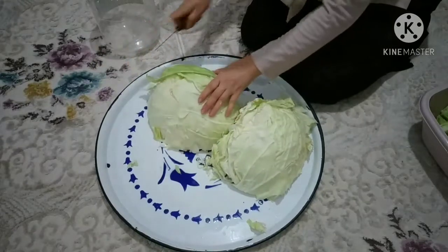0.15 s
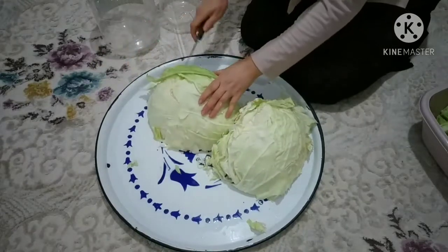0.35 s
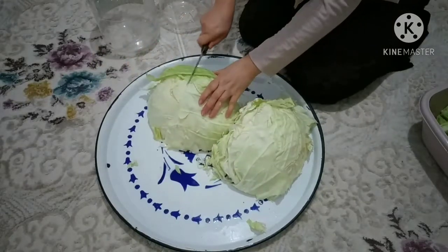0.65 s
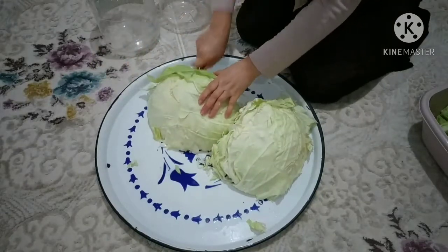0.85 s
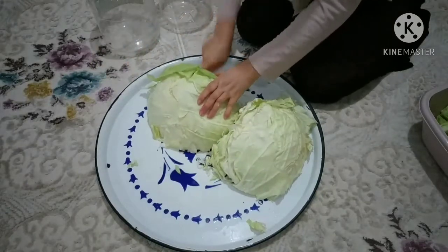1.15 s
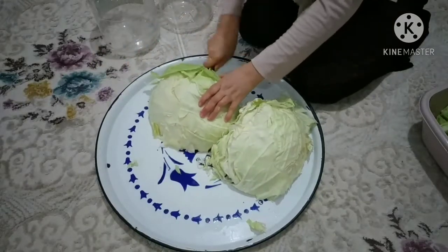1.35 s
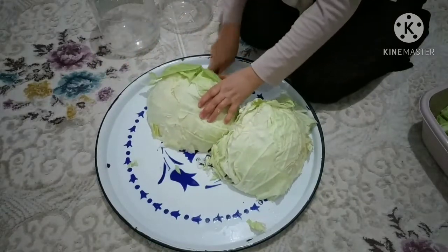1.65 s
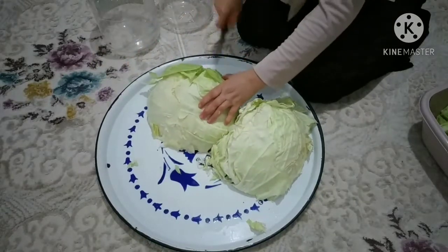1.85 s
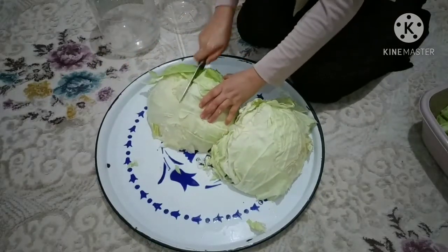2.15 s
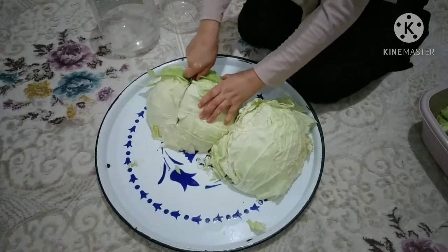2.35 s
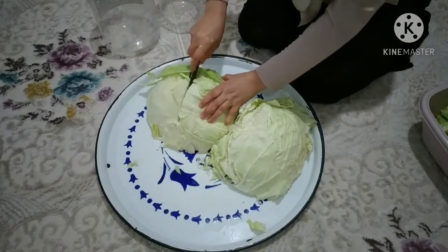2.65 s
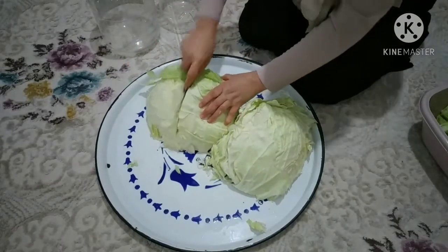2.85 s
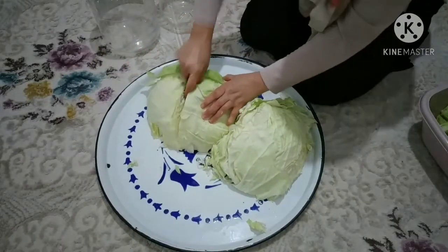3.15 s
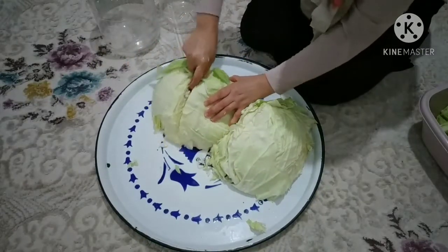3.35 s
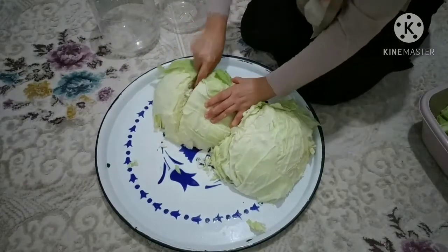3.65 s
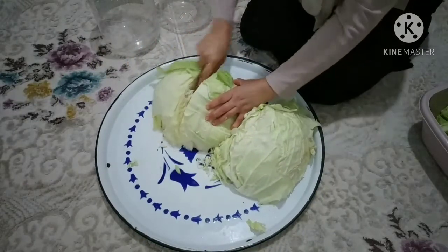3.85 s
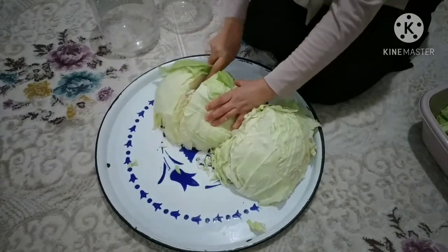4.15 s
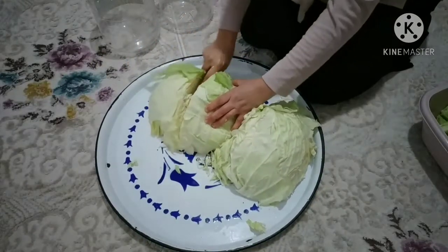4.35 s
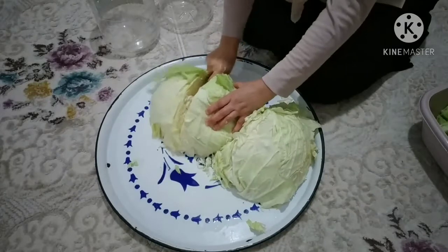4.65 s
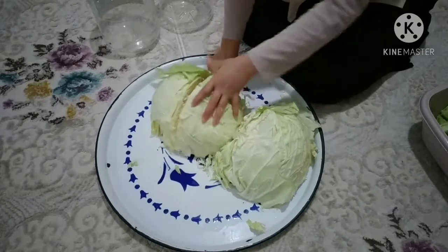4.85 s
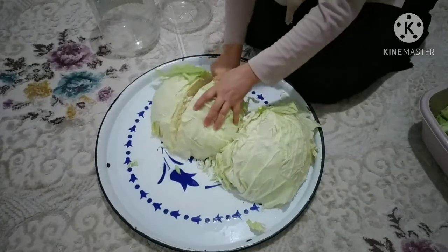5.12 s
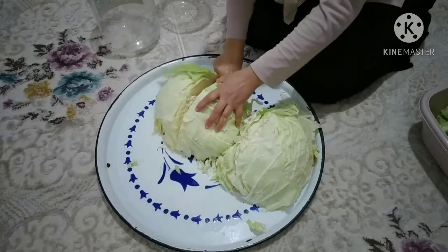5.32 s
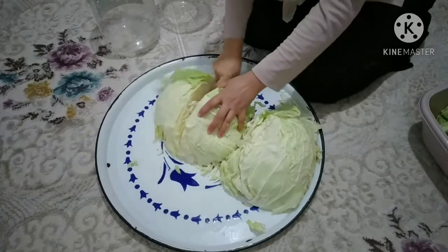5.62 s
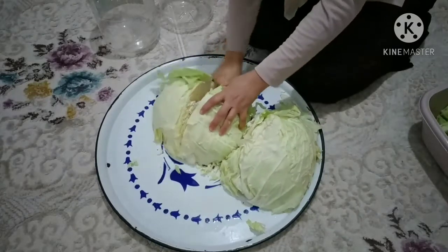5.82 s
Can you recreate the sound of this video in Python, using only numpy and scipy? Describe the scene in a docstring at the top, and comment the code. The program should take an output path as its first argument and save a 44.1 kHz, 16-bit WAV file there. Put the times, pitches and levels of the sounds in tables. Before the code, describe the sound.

A knife saws through a crisp raw cabbage in crunching strokes, with one loud metallic knock on an enamel tray in a quiet room.

```python
"""Crisp crunching strokes: a kitchen knife saws through a raw cabbage on an enamelled tray, on carpet, in a small room.
After a hand on the leaves, strokes and scuffs speed up, bite and stop; random fractures shake, crunch and spray.
Ringing modes make the snapping ribs, thuds of the head, dull taps and the tray that the blade knocks and drags over.
Once the blade squeaks, as a wavering harmonic tone; the knock overloads the microphone, whose output swings slowly.
Dull air noise and a faint hum of sines lie below."""
import sys
import numpy as np
from scipy import signal
from scipy.fft import rfft, irfft
from scipy.io import wavfile
from scipy.ndimage import uniform_filter1d

SR = 44100
rng = np.random.default_rng(int(sys.argv[2]) if len(sys.argv) > 2 else 0)


def file_out(sig):
    """Save sig as 16-bit WAV at sys.argv[1]."""
    # one column per channel
    cols = np.atleast_2d(sig).T
    # limit, then scale
    lim = np.clip(cols, -1, 1)
    pcm = np.round(lim * 32767).astype(np.int16)
    wavfile.write(sys.argv[1], SR, pcm)


N = 263718
TIME = np.arange(N) / SR


def from_db(db):
    """Decibels to amplitude gain."""
    return 10 ** (np.asarray(db) / 20)


def rms_one(x):
    """Scale to unit power."""
    return x / np.sqrt(np.mean(x ** 2) + 1e-20)


def in_time(rows):
    """Each column of a time curve, interpolated at every sample."""
    time_s, *columns = np.transpose(rows)
    return [np.interp(TIME, time_s, column) for column in columns]


def drift(knots_per_s):
    """Random values at regular knots, joined by straight lines, rms 1."""
    knots = rng.standard_normal(4096)
    return rms_one(np.interp(TIME * knots_per_s, np.arange(len(knots)), knots))


def convolve(x, response):
    """Pass one or two channels through a response."""
    full = signal.fftconvolve(np.atleast_2d(x), np.atleast_2d(response), axes=-1)
    return full[:, :N]


def colour(x, spectrum, size=8192):
    """Causal minimum-phase filter with the given spectrum, via the folded cepstrum."""
    hz, db = np.transpose(spectrum)
    grid_hz = np.maximum(np.arange(size // 2 + 1) * SR / size, 1)
    gain = from_db(np.interp(np.log(grid_hz), np.log(hz), db))
    cepstrum = irfft(np.log(gain))
    cepstrum[1:size // 2] *= 2
    cepstrum[size // 2 + 1:] = 0
    return convolve(x, irfft(np.exp(rfft(cepstrum))))[0]


def ring(clicks, hz, t60_s):
    """Two-pole resonator: a unit click starts a decaying sine of height 1."""
    radius = from_db(-60 / (t60_s * SR))
    angle = 2 * np.pi * hz / SR
    poles = [1, -2 * radius * np.cos(angle), radius * radius]
    return signal.lfilter([0, np.sin(angle)], poles, clicks + 1e-18)


def clicks_of(events, extra_db=0):
    """One click per row (time [s], level [dB])."""
    time_s, db = np.transpose(events)
    clicks = np.zeros(N)
    clicks[(time_s * SR).astype(int)] = from_db(db + extra_db)
    return clicks


def strike(events, modes, vary_db):
    """Every blow excites each mode with a random strength of its own."""
    chance_db = vary_db * rng.standard_normal((len(events), len(modes)))
    return sum(ring(clicks_of(events, db + chance_db[:, k]), hz, t60_s)
               for k, (hz, db, t60_s) in enumerate(modes))


def fractures(per_s, spread_db, clump_db, spectrum):
    """Cells burst at random, mostly small, in clumps as leaves give way; short-term power is levelled."""
    sizes = from_db(spread_db * np.minimum(rng.exponential(1, N), 4)) * rng.choice([-1, 1], N)
    bursts = sizes * (rng.random(N) < per_s / SR) * from_db(clump_db * drift(170))
    sound = colour(bursts, spectrum)
    power = np.abs(uniform_filter1d(sound ** 2, size=3000))
    return sound / np.sqrt(power + 1e-12)


def two_ports(size, apart_hz):
    """Diffuse noise at two close ports: alike in the bass, increasingly unlike in the treble."""
    mid, side = rng.standard_normal((2, size))
    side = signal.sosfilt(signal.butter(1, apart_hz, "high", fs=SR, output="sos"), side)
    return mid + side * np.array([[1], [-1]])


def room(x, wet_db, t60_s, early_db, early_t60_s=0.04, delay_samples=4):
    """Direct sound, quick reflections from the tray and the room's tail, scaled to keep mean power."""
    t = TIME[:SR // 3]
    early = two_ports(len(t), 800) * from_db(-60 * t / early_t60_s) * (t > .0004)
    # long waves bend round the tray
    early = signal.sosfilt(signal.butter(2, 550, "high", fs=SR, output="sos"), early)
    late = two_ports(len(t), 500) * from_db(-60 * t / t60_s) * (t > .005)
    response = (from_db(early_db) * rms_one(early) + from_db(wet_db) * rms_one(late)) / np.sqrt(len(t))
    response[0, delay_samples] += 1  # off axis: left hears the direct sound later
    response[1, 0] += 1
    return convolve(x, response / np.sqrt(1 + from_db(early_db) ** 2 + from_db(wet_db) ** 2))


def speed(start_s, length_s, up_s, down_s):
    """Speed of one movement, 0-1: linear rise, hold, linear fall."""
    rise = (TIME - start_s) / up_s
    fall = (start_s + length_s - TIME) / down_s
    return np.clip(np.minimum(rise, fall), 0, 1)


# strokes of the blade and short scuffs, the first by a hand on the leaves: (start [s], length [s],
# relative sliding level [dB], extra force of the bite [dB], crispness [dB], shaking of the head [dB])
STROKES = [(0.064, 0.13, -53, -9, 8, -12), (0.663, 0.13, -48, -16, 7.5, 16.5),
           (0.724, 0.34, -45, 12, 1.5, 0), (1.055, 0.34, -48, 14.5, 1.5, -0.5),
           (1.384, 0.2, -35.5, 2.5, 1, -1), (1.597, 0.29, -47.5, 1.5, 9.5, -4),
           (2.083, 0.36, -54, -6.5, 4, 0.5), (2.186, 0.31, -48, 8.5, 4.5, 1.5),
           (2.397, 0.22, -46, -2.5, -3.5, 3.5), (2.588, 0.13, -48.5, -4, -1.5, 1.5),
           (2.759, 0.36, -44, 7, 1, -3), (3.045, 0.38, -47.5, 10, 0, 0), (3.362, 0.17, -39, 1.5, 0, 2.5),
           (3.488, 0.18, -47.5, 5, -1, 3), (3.606, 0.38, -42.5, 6, -1, -1.5),
           (3.877, 0.26, -45.5, 4.5, -0.5, -3.5), (4.059, 0.19, -41, 2, -2.5, -4.5),
           (4.176, 0.26, -44, 2.5, -4, -3), (4.335, 0.25, -47.5, 5, -12.5, -2.5),
           (4.466, 0.28, -46, 5, -0.5, 0), (4.687, 0.27, -41, -2.5, -1, -2),
           (4.892, 0.21, -38.5, -10.5, -2.5, -13), (5.045, 0.24, -47, 4, -1.5, 3.5),
           (5.236, 0.14, -43.5, 3, -2.5, 0), (5.354, 0.35, -45.5, 6.5, -3.5, 0.5),
           (5.722, 0.21, -39.5, -7.5, -7, 3.5)]
# spectra of head, leaves and bursting cells: (frequency [Hz], relative level [dB])
SHAKE_SPECTRUM = [(60, -33), (130, -10.5), (175, -13.5), (215, -1), (300, 1.5), (380, -2.5), (460, -9.5),
                  (600, -16), (1000, -56)]
CRUNCH_SPECTRUM = [(200, -12.5), (450, 2), (650, -5), (880, 3), (1150, -2.5), (1500, -1), (2000, -4),
                   (2500, -9.5), (3000, -22), (3600, -36.5), (6000, -59)]
SPRAY_SPECTRUM = [(1500, -27), (2800, 7.5), (3400, 4), (4300, 4), (6000, 1.5), (7500, 2), (8800, -6.5),
                  (11000, -9), (13000, -20.5), (15500, -33)]
# how each layer follows a stroke: (relative level [dB], share of full speed at which it sets in [0-1],
# exponent of speed [-], exponent of force [-])
SHAKE_LAW = (-1, 0.34, 0.7, 1.23)
CRUNCH_LAW = (1.1, .05, 0.88, 1.32)
SPRAY_LAW = (-12.5, 0.3249, 1.52, 1.02)


def cutting(flaps_db=-8.5):
    """Fractures shake the head, crunch in the leaves and spray fine ticks that are nearly dry."""
    *_, crispness_db, shaking_db = np.transpose(STROKES)
    shaking = np.sqrt(settling(stroke_power(SHAKE_LAW, shaking_db), creak_db=-12))
    tearing = np.sqrt(settling(stroke_power(CRUNCH_LAW, np.zeros(len(STROKES))), creak_db=-12.5))
    bursting = np.sqrt(settling(stroke_power(SPRAY_LAW, crispness_db), creak_db=-18.5))
    shake = shaking * fractures(per_s=600, spread_db=2.5, clump_db=0.5, spectrum=SHAKE_SPECTRUM)
    crunch = tearing * fractures(per_s=1200, spread_db=2.5, clump_db=1.0, spectrum=CRUNCH_SPECTRUM)
    flap_tone = colour(fibres(), [(300, -8), (600, 4), (2400, 0.0), (3500, -28)])
    flaps = tearing * from_db(flaps_db) * flap_tone
    spray = bursting * fractures(per_s=12000, spread_db=4.0, clump_db=1.5, spectrum=SPRAY_SPECTRUM)
    head = room(shake + thuds(), wet_db=-9.5, t60_s=.25, early_db=-11.5)
    leaves = along_the_blade(crunch + flaps + ribs(), wet_db=-2.5, t60_s=0.2, early_db=1, early_t60_s=0.016)
    ticks = along_the_blade(spray, wet_db=-16, t60_s=.05, early_db=-2.5, early_t60_s=0.081)
    return head + leaves + ticks


SPEED_UP_S, SLOW_DOWN_S = 0.088, 0.089
BITE_AT_S, BITE_BUILD_S, BITE_EASE_S = .126, .046, .064  # peak after stroke start; Gaussian widths


def stroke_power(law, trims_db):
    """Power of all strokes and scuffs in one layer: grows with speed and with the force of the bite."""
    layer_db, least_speed, speed_power, force_power = law
    power = np.zeros(N)
    for (start_s, length_s, slide_db, bite_db, _, _), trim_db in zip(STROKES, trims_db):
        stroke_speed = speed(start_s, length_s, SPEED_UP_S, SLOW_DOWN_S)
        pace = (stroke_speed - least_speed) / (1 - least_speed)
        moving = pace > 0
        late_s = TIME[moving] - start_s - BITE_AT_S
        width_s = np.where(late_s < 0, BITE_BUILD_S, BITE_EASE_S)
        force = from_db(bite_db * np.exp(-(late_s / width_s) ** 2))
        level = from_db(layer_db + slide_db + trim_db)
        power[moving] += (level * pace[moving] ** speed_power * force ** force_power) ** 2
    return power


def settling(power, creak_db, settle_s=.13):
    """Parted leaves creak on after a stroke; the creak's power decays exponentially."""
    keep = np.exp(-1 / (settle_s * SR))
    return power + from_db(creak_db) ** 2 * signal.lfilter([1 - keep], [1, -keep], power)


def along_the_blade(x, wet_db, t60_s, early_db, early_t60_s, count=6):
    """The tear hops between spots along the blade, each with its own reflections, so the colour shifts."""
    shares = np.array([from_db(52 * drift(28)) for spot in range(count)])
    shares /= np.sum(shares, axis=0)
    return sum(room(x * share, wet_db, t60_s, early_db, early_t60_s, delay_samples=2 + spot % 4)
               for spot, share in enumerate(shares))


def fibres(per_s=170, cycles=60, count=28):
    """Torn fibres set flaps of leaf ringing, each at one of many pitches, for a fixed count of cycles."""
    plucks = (rng.random(N) < per_s / SR) * from_db(2.5 * rng.standard_normal(N))
    dealt = rng.integers(0, count, N)
    pitches_hz = np.geomspace(620, 2400, count)
    return rms_one(sum(ring(plucks * (dealt == k), hz, cycles / hz) for k, hz in enumerate(pitches_hz)))


# ribs snap; a hand ticks the leaves at the start, a light tap comes near the end:
# (time [s], relative level [dB])
SNAPS = [(0.11, -43), (0.118, -38.5), (0.709, -38), (0.779, -35), (0.827, -33), (0.842, -21), (0.969, -50),
         (0.985, -25.5), (1.131, -24), (1.443, -25.5), (1.837, -38), (1.851, -31), (1.9, -39),
         (2.364, -24.5), (2.907, -30.5), (3.178, -29), (3.21, -45), (3.413, -33), (4.146, -33.5),
         (4.412, -33), (4.622, -26), (5.169, -31.5), (5.918, -41)]
# modes of a snapping rib: (frequency [Hz], relative level [dB], t60 [s])
RIB_MODES = [(497, -12.5, 0.0089), (1020, 12, 0.012), (1458, 14, 0.0051), (1927, 14.5, 0.0046),
             (2230, -38, .008), (7200, -30, .004)]
# treble loss of short contacts in wet leaves: (frequency [Hz], gain [dB])
WET_LEAVES = [(2300, 0.5), (2800, -9.5), (3500, -12.5), (5000, -2.5), (7500, -1), (12000, -11.5)]


def ribs(splinter_t60_s=0.021, splinters_per_s=500):
    """Snaps of ribs, and a few ticks and a tap, excite short modes; smaller random splinters follow each."""
    cracks = clicks_of(SNAPS)
    after = signal.lfilter([1], [1, -from_db(-60 / (splinter_t60_s * SR))], cracks + 1e-18)
    splinters = rng.standard_normal(N) * (rng.random(N) < splinters_per_s / SR)
    cracks = cracks + 0.35 * after * splinters
    rings = sum(from_db(db) * ring(cracks, hz, t60_s) for hz, db, t60_s in RIB_MODES)
    return from_db(-12) * colour(rings, WET_LEAVES)


# the head gives way and bumps the tray: (time [s], relative level [dB], pitch [Hz])
THUDS = [(0.78, -30, 223), (0.832, -16.5, 215.6), (0.876, -21, 328), (1.148, -19, 345),
         (1.234, -22.5, 272.5), (1.374, -27.5, 271), (2.366, -17.5, 242), (2.532, -30.5, 335),
         (2.867, -21.5, 284.6), (3.338, -29.5, 266), (3.433, -45, 270), (3.596, -25, 229.4),
         (3.823, -31.5, 346), (4.028, -30, 340.5), (4.326, -30.5, 289), (4.578, -25.5, 260),
         (4.885, -29.5, 296), (5.172, -25.5, 295), (5.455, -24.5, 366)]
# modes of the head on the tray: (multiple of its pitch [-], relative level [dB], t60 [s])
HEAD_MODES = [(.78, -7.5, 0.078), (1, 3.5, 0.11), (1.3, -6, 0.22)]


def thuds():
    """The head thuds as the blade jumps on, pitched by the grip; too small to radiate deep bass."""
    sound = np.zeros(N)
    for time_s, db, pitch_hz in THUDS:
        modes = [(pitch_hz * ratio, level_db, t60_s) for ratio, level_db, t60_s in HEAD_MODES]
        sound = sound + strike([(time_s, db)], modes, vary_db=2.5)
    radiation = [(60, -17.0), (130, -18.5), (200, 1.5), (500, -0.5), (1500, -12.5)]
    return from_db(-7.5) * colour(sound, radiation)


# dull knife taps, damped by the cabbage: (time [s], relative level [dB])
TAPS = [(2.0205, -34.5), (2.0268, -25.5), (5.7665, -15.5), (5.769, -48)]
# modes of a tap: (frequency [Hz], relative level [dB], t60 [s])
TAP_MODES = [(335, -11, 0.028), (770, -12, 0.064), (1120, -1.5, 0.0092), (1620, -3.5, 0.018),
             (1910, 2.5, 0.0064), (2080, -36, 0.01)]


def taps(soft_hz=3200):
    """Soft contacts: short modes with the treble rounded off."""
    low_pass = signal.butter(2, soft_hz, fs=SR, output="sos")
    soft = signal.sosfilt(low_pass, strike(TAPS, TAP_MODES, vary_db=2.5))
    return from_db(-3.5) * colour(soft, WET_LEAVES)


# stick-slip of the wet blade: (time [s], fundamental [Hz], relative level [dB])
SQUEAK = [(1.0, 442, -64), (1.025, 482, -38), (1.05, 470, -34.5), (1.085, 476, -44), (1.115, 490, -43),
          (1.14, 470, -73.5)]


def squeak(fall_db=-6.5, count=4):
    """Stick-slip of the blade in the cut: a short, slightly unsteady harmonic tone."""
    hz, db = in_time(SQUEAK)
    phase = 2 * np.pi * np.cumsum(hz * (1 + 0.0046 * drift(220))) / SR
    sounding = (TIME > SQUEAK[0][0]) & (TIME < SQUEAK[-1][0])
    harmonics = sum(from_db(fall_db * k) * np.sin((k + 1) * phase) for k in range(count))
    return sounding * from_db(db) * harmonics


# modes of the loaded tray, lowest ones damped by the carpet: (centre [Hz], relative level [dB], undamped t60 [s])
TRAY_MODES = [(151, -7.5, 0.12), (209, -2, .12), (242, 6, 0.12), (285, 5, 0.27), (328, 7, 0.39),
              (363, 7, 0.34), (461, 5.5, 0.21), (550, -5.5, 0.16), (625, -12, 0.59), (852, -6, 0.07),
              (980, 0, 0.1), (1210, -36, 0.35), (1478, -18, 0.86), (1573, -5.5, 0.76), (1566, -6, 0.29),
              (1850, -1, 0.33), (2073, 1.5, 0.27), (1970, -21, 0.71), (2074, -4.5, 0.16), (2084, -16.5, .3),
              (2270, 0.5, 0.32), (2417, -3, 0.33), (2700, -20.5, 0.17), (3260, -32, 0.11),
              (3550, -17, 0.55), (5500, -17.5, 0.43), (6800, -18.5, .3), (7251, -30.5, 0.23),
              (7480, -24, 0.31)]


def tray_modes(split=.014):
    """The tray is not quite round, so each mode is a close pair that beats."""
    return [(hz * (1 + side * split), db - 3.5, t60_s) for hz, db, t60_s in TRAY_MODES for side in (-1, 1)]


# the blade lands on the tray and chatters: (time [s], relative strength [dB])
KNOCKS = [(1.4818, 2.5), (1.4845, -8), (1.496, -12)]
# spectrum of the crash: (frequency [Hz], relative level [dB])
CRASH_SPECTRUM = [(40, -4), (110, -8.5), (280, 9.5), (400, 1), (560, 4), (1000, -1), (1450, 1.5),
                  (2000, 1.5), (2500, -6), (3000, -11), (4500, -20.5), (7400, -13.5), (8800, -23.5),
                  (11000, -23.5), (15500, -39)]


def knock(crash_t60_s=.2, tail_t60_s=0.64, tail_db=-18):
    """The blade hits the tray: a crack, a noise wash of dense short modes, and clear modes ringing on."""
    t = TIME[:SR]
    decay = from_db(-60 * t / crash_t60_s) + from_db(tail_db - 60 * t / tail_t60_s)
    wash = two_ports(SR, 900) * decay
    blows = clicks_of(KNOCKS)
    crash = [colour(from_db(26) * blows + from_db(-5.0) * port, CRASH_SPECTRUM)
             for port in convolve(blows, wash)]
    return np.array(crash) + from_db(-22.5) * strike(KNOCKS[:1], tray_modes(), vary_db=2.0)


# jerks of the blade over the tray: (start [s], length [s], relative level [dB])
DRAGS = [(1.663, 0.076, -39.5), (1.72, 0.097, -36), (1.836, 0.041, -43.5)]


def drag(t60_factor=0.2):
    """The edge scrapes over the enamel in jerks; grit excites the tray modes, which the blade damps."""
    jerks = sum(from_db(db) * speed(start_s, length_s, up_s=0.012, down_s=0.036)
                for start_s, length_s, db in DRAGS)
    grit_spectrum = [(500, -44.5), (1200, -16), (1600, -5), (2000, 3.5), (2400, -4.0), (3000, -9), (8000, 6)]
    grit = fractures(per_s=1000, spread_db=2, clump_db=4.0, spectrum=grit_spectrum)
    rings = sum(from_db(db) * ring(grit, hz, t60_s * t60_factor) for hz, db, t60_s in tray_modes())
    return jerks * rms_one(rings)


def overload_swing(height=0.46, crossing_s=0.05, swing_hz=2.6, settle_s=0.076, rise_s=0.0014):
    """The blow overloads the microphone: its output swings slowly, crosses zero and settles."""
    t = np.maximum(TIME - KNOCKS[0][0], 0)
    swing = np.sin(2 * np.pi * swing_hz * (crossing_s - t))
    shape = swing * np.exp(-t / settle_s) * (1 - np.exp(-t / rise_s))
    port_gains = from_db([[1.5], [-4]])
    return height * shape / np.max(np.abs(shape)) * port_gains


# spectrum of the room air: (frequency [Hz], relative level [dB])
AIR_SPECTRUM = [(25, -9.5), (50, -15), (100, -15), (170, -23), (230, -20.5), (285, -18.5), (335, -12.5),
                (400, -24), (490, -20.5), (620, -28.5), (1000, -34), (2000, -38.5), (2600, -48.5),
                (3500, -58), (6000, -59.5)]
# hum of a distant motor: (frequency [Hz], typical level [dB rms])
HUM = [(100.5, -56), (231.5, -60.5), (330, -58), (441, -64.5), (495, -72.5)]


def background(air_db=-51.5):
    """Dull room air as filtered noise, and a motor hum of sines wavering in level and phase."""
    air = rms_one(np.array([colour(port, AIR_SPECTRUM) for port in two_ports(N, 900)]))
    hum = np.zeros(N)
    for hz, db in HUM:
        level = from_db(db + 0.92 * drift(2.9)) * np.sqrt(2)
        hum = hum + level * np.sin(2 * np.pi * hz * TIME + .5 * drift(4.4))
    return from_db(air_db) * air + hum


def scene():
    """Cabbage and tray sound in the same small, carpeted room."""
    blade = room(taps() + squeak(), wet_db=-7.5, t60_s=0.23, early_db=-1.5, delay_samples=3)
    tray = room(knock() + drag(), wet_db=-15, t60_s=0.42, early_db=-5.5, early_t60_s=0.037, delay_samples=5)
    return cutting() + blade + tray + overload_swing() + background()


def suppress_hiss(x, threshold_db=-68):
    """Noise suppressor: treble is turned down by up to 12 dB as its level falls below the threshold."""
    treble = signal.sosfiltfilt(signal.butter(6, 3100, "high", fs=SR, output="sos"), x)
    power = np.abs(uniform_filter1d(np.mean(treble ** 2, axis=0), size=700))
    level_db = 10 * np.log10(power + 1e-14)
    cut_db = -12 * (.5 - .5 * np.tanh((level_db - threshold_db) / 2.5))
    return x - treble * (1 - from_db(cut_db))


# difference of the two microphone ports: (frequency [Hz], left minus right [dB])
PORTS = [(100, 2), (300, 0.35), (600, 0.5), (1500, 0.5), (3000, 2), (5000, 2), (7300, 13), (9000, 0),
         (11000, -15), (15000, 0.5)]


def record(dry, cutoff_hz=15450):
    """Each port has its own colour; peaks clip; faint treble is suppressed; the top is cut."""
    ports = np.array([colour(x, [(hz, side * db / 2) for hz, db in PORTS])
                      for x, side in zip(dry, (1, -1))])
    heard = suppress_hiss(np.clip(ports, -1, 1))
    return signal.sosfilt(signal.ellip(10, .1, 70, cutoff_hz, fs=SR, output="sos"), heard)


dry = scene()
out = record(dry)
file_out(out)
```